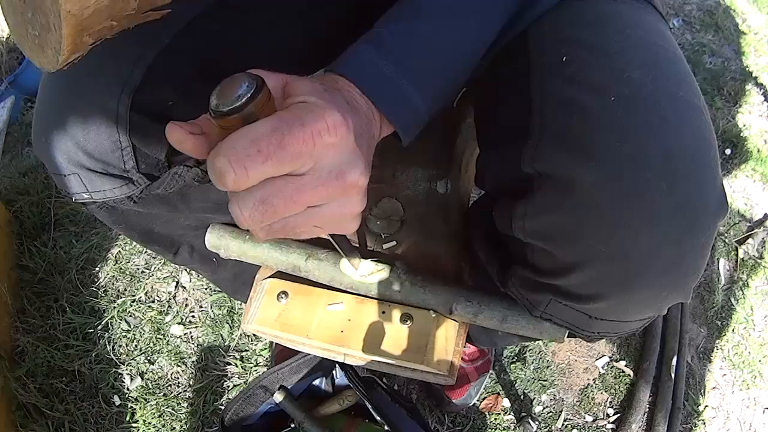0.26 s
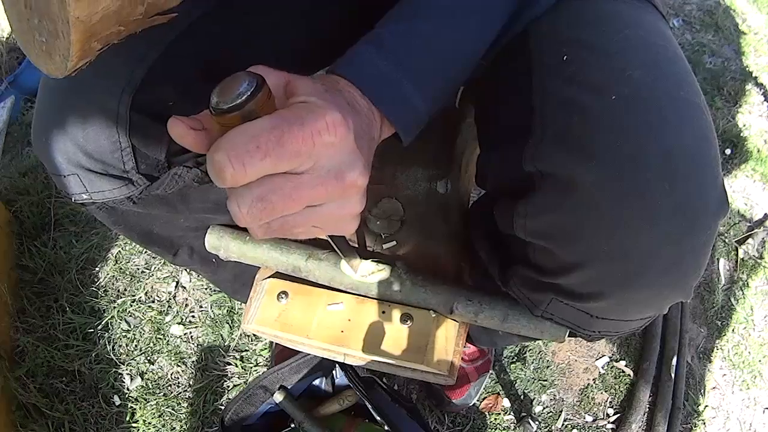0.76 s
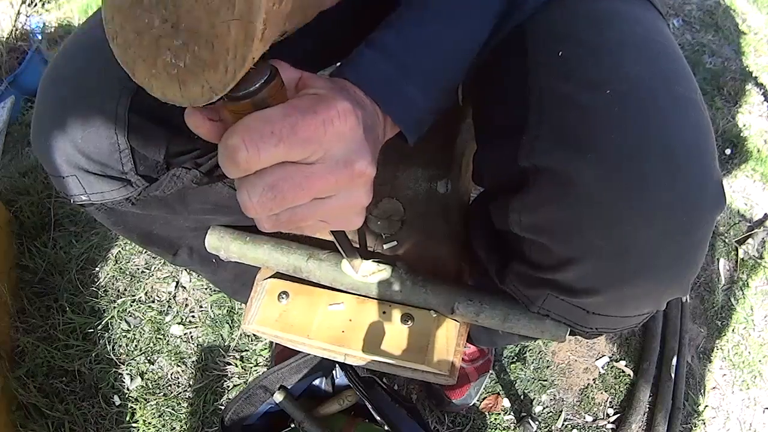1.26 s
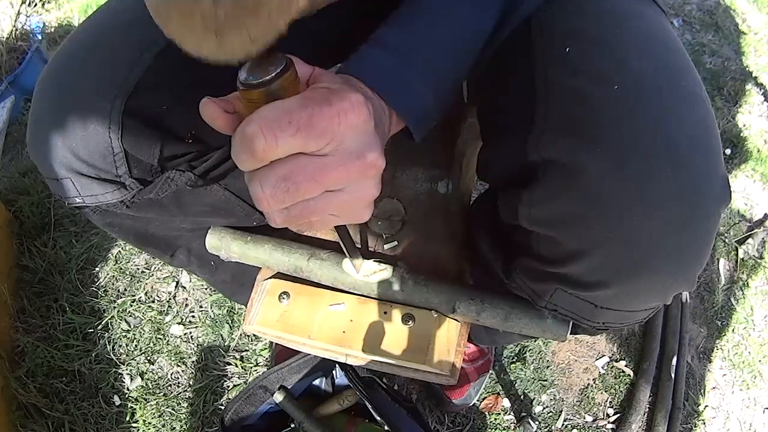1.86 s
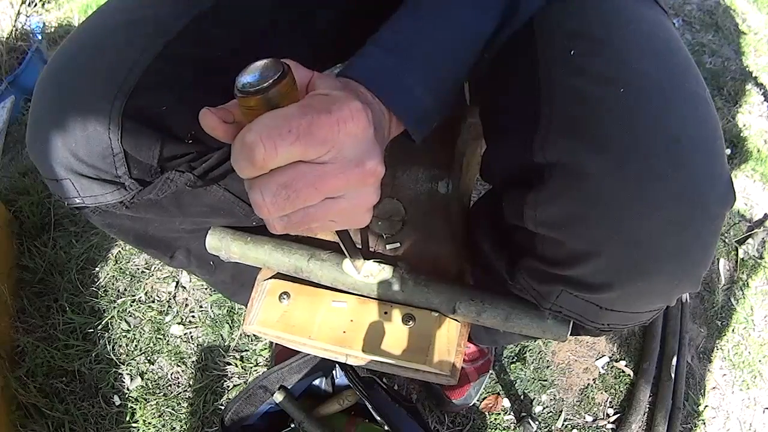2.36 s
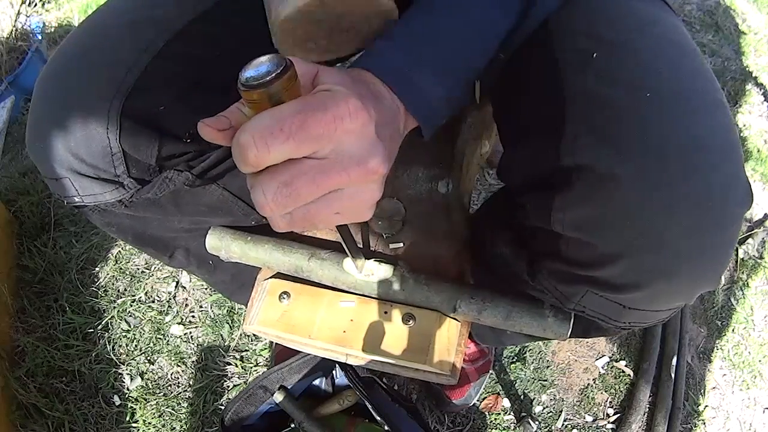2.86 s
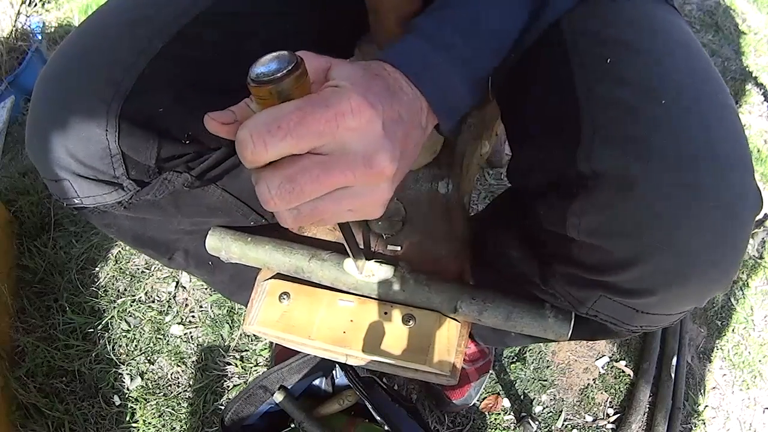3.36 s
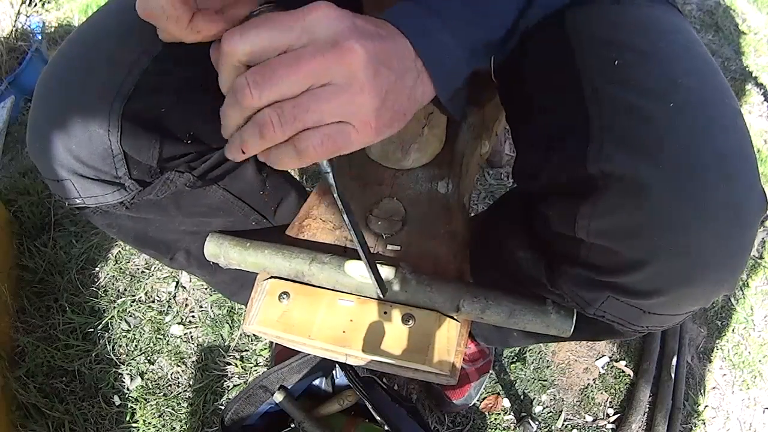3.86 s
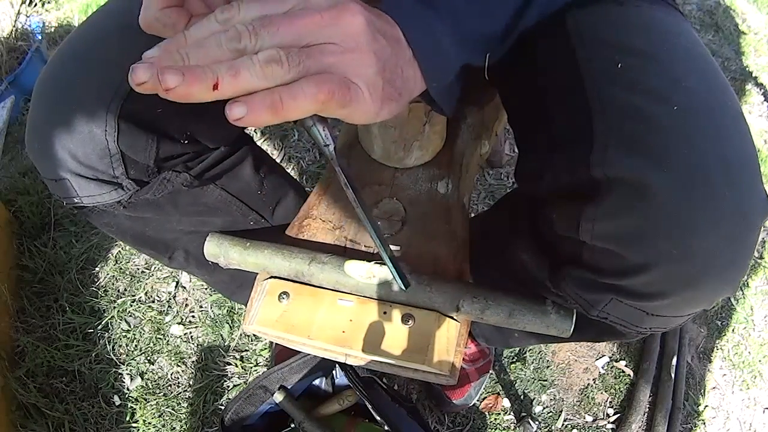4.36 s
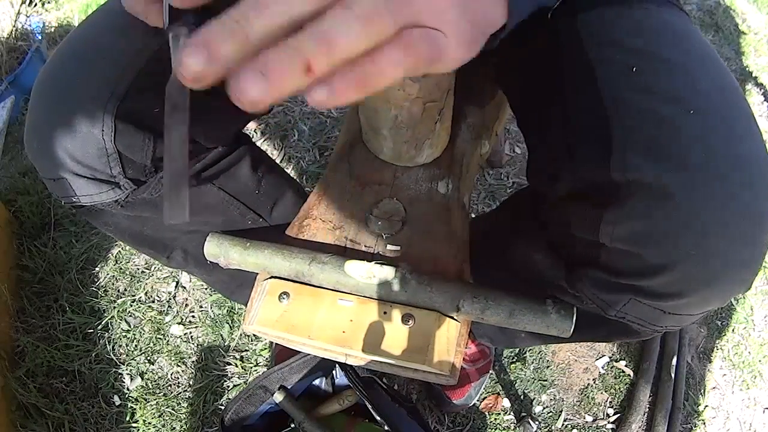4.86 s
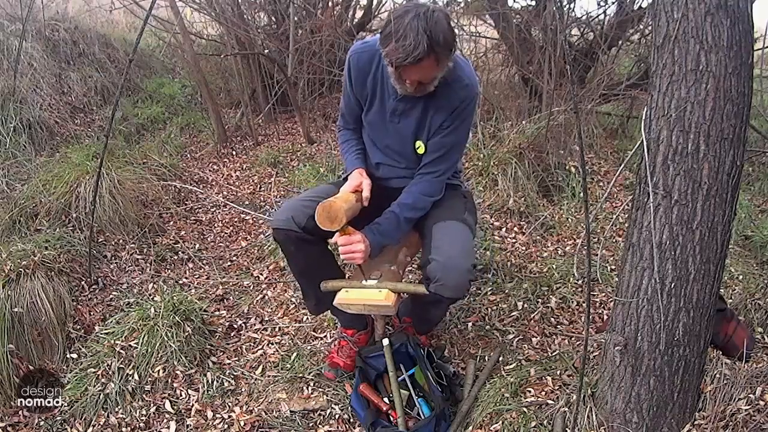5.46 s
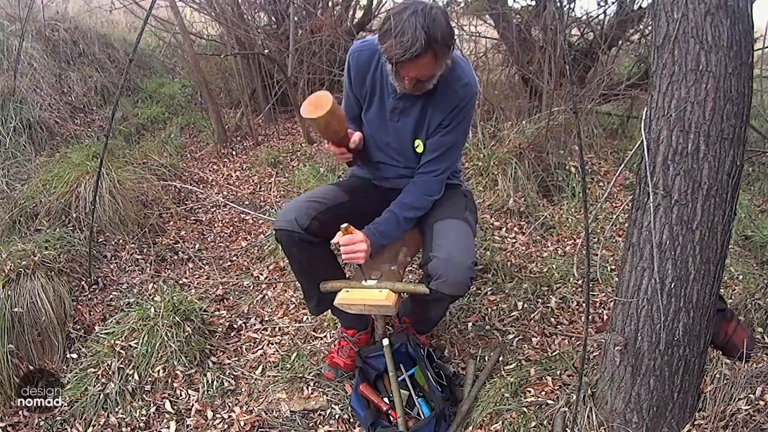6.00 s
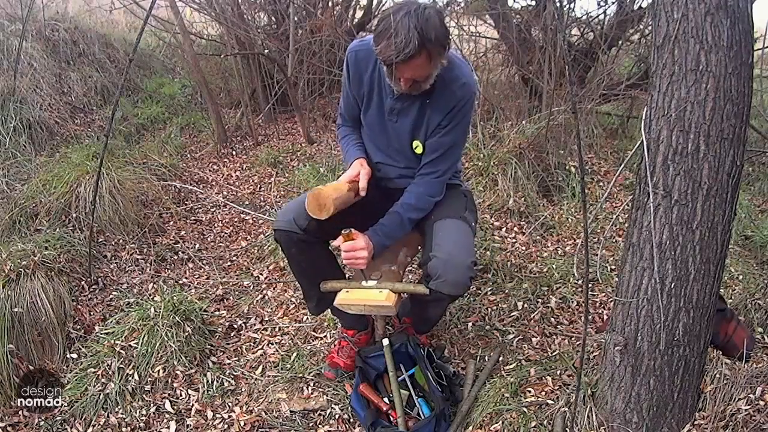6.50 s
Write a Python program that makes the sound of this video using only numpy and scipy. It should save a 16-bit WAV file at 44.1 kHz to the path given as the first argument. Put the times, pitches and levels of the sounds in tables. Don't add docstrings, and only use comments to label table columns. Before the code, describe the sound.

A close stereo microphone hears chisel work on a stick over a hollow block. After almost two seconds of soft open air and tiny ticks, two loud dry knocks split fibres. Wood thuds, gritty rubbing and light hollow taps follow with sleeve rustle. It goes quiet, a few muted bumps return, then a last ringing knock and a brush of cloth, with little reverberation.

```python
import sys
import numpy as np
from scipy import signal
from scipy.fft import rfft, irfft, next_fast_len
from scipy.io import wavfile
from scipy.ndimage import uniform_filter1d

SR = 44100
rng = np.random.default_rng(int(sys.argv[2]) if len(sys.argv) > 2 else 0)


def file_out(sig):
    cols = np.atleast_2d(sig).T
    lim = np.clip(cols, -1, 1)
    pcm = np.round(lim * 32767).astype(np.int16)
    wavfile.write(sys.argv[1], SR, pcm)


def gain_from_db(level_db):
    decades = np.asarray(level_db, float) / 20
    return 10 ** decades


N = 297054

# frequency in Hz, level in dB, decay time t60 in seconds.
FIRST_BLOW_MODES = [(165, -15, 0.083), (283, -5.5, 0.047), (343, -4, 0.12), (817, -7.5, 0.028),
                    (1320, -14.5, 0.043), (1728, -13, 0.08), (2370, -9, 0.017), (2750, -10, 0.037),
                    (2820, -14.5, 0.049), (4000, -18, 0.043), (6400, -2.5, 0.0099), (9000, -18, 0.011)]
SECOND_BLOW_MODES = [(170, -13, 0.035), (347, -9.5, 0.041), (450, -13, 0.24), (820, -2.5, 0.03),
                     (1000, -3, 0.024), (1305, -14, 0.077), (1750, -5, 0.019), (2850, -15.5, 0.026),
                     (4120, -6.5, 0.012), (5800, -24, 0.016), (7400, -23, 0.016)]
THIRD_BLOW_MODES = [(165.6, -9, 0.062), (276, -13, 0.22), (324.5, -4.5, 0.21), (376.6, -14.5, 0.14),
                    (446, -15.5, 0.16), (590, -10, 0.049), (948, -4.5, 0.054), (1500, -13, 0.027),
                    (1620, -2, 0.015), (1870, -5, 0.024), (2470, -24, 0.048), (3870, -10, 0.027),
                    (6500, 1.5, 0.0078), (9800, -21, 0.013)]
# start in seconds, level in dB, contact sharpness in Hz, lowest mode moved in Hz.
FIRST_BLOW_HITS = [
    (1.9115, -13.5, 9000, 30),
    (1.9144, -16, 2970, 1400),
    (1.936, -18.5, 3500, 600),
]
SECOND_BLOW_HITS = [
    (2.4235, -11.5, 9000, 30),
    (2.438, -33, 7000, 1500),
]
THIRD_BLOW_HITS = [
    (6.2476, -16, 9000, 30),
    (6.2503, -7, 2970, 1200),
    (6.2776, -28.5, 5000, 600),
]
# start in seconds, crack level in dB, crack t60 in seconds, scatter level in dB,
# travel time at 1 kHz in seconds.
SPLINTER_CRACKS = [
    (1.9114, -14, 0.027, -31, 0.0041),
    (2.4219, -28.5, 0.015, -35.5, 0.0055),
    (6.2486, -17.5, 0.024, -29.5, .0035),
]
# frequency in Hz, level in dB.
CRACK_SPECTRUM = [(150, -44), (400, -29), (800, -19), (1600, -14), (2300, -17), (6200, -23), (11000, -31),
                  (14000, -60)]
# start in seconds, level in dB, thud pitch in Hz, thud t60 in seconds.
HELD_TAPS = [(2.968, -28, 573, 0.078), (2.972, -20, 325, 0.079), (2.988, -18.5, 825, 0.009),
             (2.995, -17, 295, 0.012), (3.013, -39.5, 690, 0.016), (3.281, -36, 342, 0.037),
             (3.732, -42, 383, 0.042), (5.11, -42, 410, 0.024), (5.182, -38.5, 600, 0.026),
             (5.184, -25, 332, 0.035), (5.211, -37.5, 1000, 0.0085), (5.27, -30, 336, 0.041),
             (5.507, -42.5, 333, 0.025)]
OPEN_TAPS = [
    (3.245, -25, 440, 0.028),
    (3.253, -31.5, 374, 0.074),
    (3.266, -30, 380, 0.018),
    (3.385, -40.5, 360, 0.031),
    (3.474, -41, 360, 0.038),
    (3.613, -34.5, 370, 0.032),
]
# frequency in Hz, level in dB, t60 in seconds.
TAPPED_BLOCK_MODES = [(600, -13.5, 0.016), (880, -13.5, 0.014), (1060, -7.5, 0.011), (1220, -12.5, 0.01),
                      (1400, -20.5, 0.053), (1770, -14.5, 0.013)]
# start in seconds, level in dB, centre pitch in Hz.
CHIP_TICKS = [(0.281, -43.5, 5300), (1.216, -40, 4570), (1.235, -47, 5000), (2.4368, -21, 3770),
              (2.503, -35.5, 3120), (2.9, -36.5, 4570), (2.923, -35, 3750), (2.949, -31, 2100),
              (2.966, -35, 5840), (3.012, -43, 6500), (3.029, -52, 6500), (3.043, -53, 6500),
              (3.056, -35, 5000), (3.246, -42, 2400), (3.6, -46, 5200), (3.731, -47, 4020),
              (3.927, -46, 4000), (4.677, -43, 7400), (4.8225, -41, 8700), (5.179, -39, 1500),
              (5.193, -40.5, 3900), (5.265, -39, 1300), (5.863, -47, 5950), (6.15, -31.5, 5040),
              (6.353, -46.5, 5000), (6.419, -47, 4000), (6.602, -48, 4000)]
LEAD_TICKS = [
    (1.901, -27.5, 3240),
    (1.9108, -36, 6000),
    (2.4232, -53, 6000),
    (6.2457, -43, 7000),
]
# time in seconds, level in dB.
SLIDE_CATCHES = [
    (2.966, -49),
    (3.013, -55),
    (3.031, -60),
]
# full from in seconds, hold in seconds, bright level in dB,
# dull over bright in dB, swell time in seconds.
SLEEVE_STROKES = [(2.265, 0.081, -46.5, -0.5, 0.11), (2.38, 0.023, -58, 5, .05),
                  (2.454, 0.045, -49, 4.5, 0.052), (2.52, 0.384, -58.5, 3, 0.064),
                  (2.71, 0.009, -56, -9, 0.06), (2.92, 0.13, -48.5, -2.5, 0.034),
                  (2.964, 0.025, -41, -22, .006), (3.09, 0.047, -57.5, -3, 0.41),
                  (4.655, 0.036, -57.5, -4, 0.55), (5.19, 0.0055, -59, 2.5, 0.1),
                  (5.46, 0.059, -56.5, -1.5, 0.17), (6.605, 0.091, -47, -16.5, 0.015),
                  (6.71, .04, -51, -5, .02)]
# frequency in Hz, density in dB per Hz.
CLOTH_SPECTRUM = [(240, -29), (400, 2), (582, 1.5), (1010, 3.5), (1120, 4.5), (1340, 6), (1920, 6.5),
                  (5420, -1), (11000, -6), (14300, -11), (22000, -120)]
# frequency in Hz, side over mid in dB.
WORK_WIDTH = [(60, -9), (200, -5), (600, -5), (1100, -3), (1900, -5), (3300, -8), (6000, -9.5),
              (10500, -9.5)]
# frequency in Hz, density in dB per Hz.
AIR_SPECTRUM = [(12, -71), (20, -30), (31, -28), (43, -0.5), (108, -0.5), (127, -4.5), (145, -8.5),
                (266, -13.5), (427, -17.5), (944, -17), (1300, -22.5), (8010, -29.5), (11000, -30.5),
                (14300, -83), (22000, -120)]
# frequency in Hz, side over mid in dB.
OPEN_AIR_WIDTH = [(60, -19), (110, -15.5), (190, -8), (340, -0.5), (600, 2), (1060, 3.5), (1880, 5),
                  (3340, 1.5), (5940, -1.5), (10500, -6.5)]
# time in seconds, level in dB.
RUMBLE_SWELL = [(0.0, -58.5), (0.6, -59.5), (0.86, -62), (1.1, -59), (2.4, -55), (2.8, -52), (3.17, -58.5),
                (4.2, -57), (5.7, -58), (6.1, -55.5), (6.74, -56.5)]
# start in seconds, end in seconds.
SILENT_GAPS = [
    (2.4155, 2.4215),
    (6.737, 6.75),
]

BUILD_UP_CYCLES = 0.3
SCATTER_T60_S = 0.19
STIFF_HZ = 172
SETTLE_S, SETTLE_LOSS_DB, SETTLE_EDGE_S = 0.039, 7.5, 0.0032
HOLLOW_HZ, HOLLOW_T60_S = 463, 0.19
HELD_RING_DB, OPEN_RING_DB = -32.5, -15.5
HELD_SHARPNESS, OPEN_SHARPNESS = 2.7, 2.8
TICK_T60_S, LEAD_T60_S = 0.012, 0.021
SLIDE_FROM_S, SLIDE_HOLD_S, SLIDE_DB, SLIDE_EDGE_S = 2.903, 0.136, -53.5, 0.0066
SLIDE_START_HZ, SLIDE_TOP_HZ, SPEED_UP_S = 4260, 6200, 0.045
CATCH_EDGE_S = 0.024
GRIT_PER_S, GRIT_DB = 1100, 11
STROKE_SWING_DB, FADE_OVER_SWELL = 21.5, 0.82
GROUND_LAG_S = 0.00177
AIR_DB = -55.5
CUTOFF_HZ = 11240


def coloured(x, points, turn=1):
    size = next_fast_len(N + 8192)
    hz = np.maximum(np.arange(size // 2 + 1) * SR / size, 1)
    point_hz, point_db = np.transpose(points)
    gain = gain_from_db(np.interp(np.log(hz), np.log(point_hz), point_db))
    factor = turn(hz) if callable(turn) else turn
    return irfft(rfft(x, size) * gain * factor, size)[:N]


def rms_one(x):
    return x / np.sqrt(np.mean(x ** 2) + 1e-20)


def drift(rate):
    steps = rng.standard_normal(int(N / SR * 60) + 2)
    return np.interp(np.arange(N) / SR * min(rate, 59), np.arange(len(steps)), steps)


def add(out, s, sound):
    at = round(s * SR)
    out[at:at + len(sound)] += sound[:N - at]


def stroke(s, hold, db, swell, fade):
    t = np.arange(N) / SR
    outside = np.maximum((s - t) / swell, 0) + np.maximum((t - s - hold) / fade, 0)
    return gain_from_db(db - STROKE_SWING_DB * np.minimum(outside, 9))


def ringing(modes, sharp_hz, lowest_hz=30):
    t = np.arange(SR // 3) / SR
    rings = 0
    for k, (hz, db, t60) in enumerate(modes):
        sense = (-1) ** k
        build_up = 1 - np.exp(-t * hz / BUILD_UP_CYCLES)
        envelope = sense * gain_from_db(db - 60 * t / t60) * build_up
        moved = 1 / (1 + (lowest_hz / hz) ** 4)
        rings = rings + envelope * np.sin(2 * np.pi * hz * t) * moved
    return signal.lfilter(*signal.butter(2, min(sharp_hz, 15000), fs=SR), rings)


def blows():
    out = np.zeros(N)
    t = np.arange(SR // 2) / SR
    seatings = [(FIRST_BLOW_MODES, FIRST_BLOW_HITS), (SECOND_BLOW_MODES, SECOND_BLOW_HITS),
                (THIRD_BLOW_MODES, THIRD_BLOW_HITS)]
    for (modes, hits), splinter in zip(seatings, SPLINTER_CRACKS):
        s, crack_db, crack_t60, scatter_db, travel_s = splinter
        rings, crack = np.zeros(N), np.zeros(N)
        for hit_s, db, sharp_hz, lowest_hz in hits:
            add(rings, hit_s, gain_from_db(db) * ringing(modes, sharp_hz, lowest_hz))
        settled = np.clip((np.arange(N) / SR - s - SETTLE_S) / SETTLE_EDGE_S, 0, 1)
        rings *= gain_from_db(-SETTLE_LOSS_DB * settled)
        fall = gain_from_db(crack_db - 60 * t / crack_t60) + gain_from_db(scatter_db - 60 * t / SCATTER_T60_S)
        add(crack, s, fall * rng.standard_normal(len(t)))
        wood = rings + gain_from_db(22) * coloured(crack, CRACK_SPECTRUM)

        def bending(hz):
            return np.exp(-4j * np.pi * travel_s * np.sqrt(1000 * (hz + STIFF_HZ)))

        out += coloured(wood, [(20, 0), (20000, 0)], bending)
    return out


def taps():
    out = np.zeros(N)
    for rows, ring_db, sharpness in [(HELD_TAPS, HELD_RING_DB, HELD_SHARPNESS),
                                     (OPEN_TAPS, OPEN_RING_DB, OPEN_SHARPNESS)]:
        for s, db, thud_hz, t60 in rows:
            modes = [(thud_hz, 0, t60), (HOLLOW_HZ, ring_db, HOLLOW_T60_S), *TAPPED_BLOCK_MODES]
            add(out, s, gain_from_db(db) * ringing(modes, sharpness * thud_hz))
    return out


def ticks():
    out = np.zeros(N)
    t = np.arange(SR // 20) / SR
    for rows, t60 in [(CHIP_TICKS, TICK_T60_S), (LEAD_TICKS, LEAD_T60_S)]:
        for s, db, hz in rows:
            burst = gain_from_db(db + 2 - 60 * t / t60) * rng.standard_normal(len(t))
            band = signal.butter(1, [0.65 * hz, min(1.28 * hz, 15000)], "band", fs=SR)
            add(out, s, signal.lfilter(*band, burst))
    return out


def slide():
    moving_s = np.maximum(np.arange(N) / SR - SLIDE_FROM_S, 0)
    hz = SLIDE_TOP_HZ - (SLIDE_TOP_HZ - SLIDE_START_HZ) * np.exp(-moving_s / SPEED_UP_S)
    phase = 2 * np.pi * np.cumsum(hz) / SR
    gain = stroke(SLIDE_FROM_S, SLIDE_HOLD_S, SLIDE_DB, SLIDE_EDGE_S, SLIDE_EDGE_S)
    for s, db in SLIDE_CATCHES:
        gain = gain + stroke(s, 0, db, CATCH_EDGE_S, CATCH_EDGE_S * 0.5)
    grain_here = rng.random(N) < GRIT_PER_S / SR
    grit = 1 + grain_here * gain_from_db(GRIT_DB + 4.8 * rng.exponential(1, N).clip(0, 4))
    one, other = signal.lfilter(*signal.butter(2, 900, fs=SR), grit * rng.standard_normal((2, N)))
    rub = rms_one(one * np.cos(phase) + other * np.sin(phase))
    return gain * gain_from_db(2.1 * drift(55)) * rub


def sleeves():
    catching = gain_from_db(0.35 * rng.exponential(1, N) + 2.0 * drift(45))
    grains = rng.standard_normal((2, N)) * catching
    cloth = np.array([coloured(draw, CLOTH_SPECTRUM) for draw in grains])
    bright = rms_one(signal.lfilter(*signal.butter(2, 1600, "high", fs=SR), cloth))
    dull = rms_one(signal.lfilter(*signal.butter(2, 2000, fs=SR), cloth))
    bright_power = dull_power = 0
    for s, hold, db, dull_db, swell in SLEEVE_STROKES:
        power = stroke(s, hold, db, swell, FADE_OVER_SWELL * swell) ** 2
        bright_power = bright_power + power
        dull_power = dull_power + power * gain_from_db(2 * dull_db)
    return np.sqrt(bright_power) * bright + np.sqrt(dull_power) * dull


def air():
    near, far = [gain_from_db(AIR_DB) * rms_one(coloured(draw, AIR_SPECTRUM))
                 for draw in rng.standard_normal((2, N))]
    low = signal.sosfiltfilt(signal.butter(2, 200, fs=SR, output="sos"), near)
    swell_s, swell_level = np.transpose(RUMBLE_SWELL)
    swell_db = np.interp(np.arange(N) / SR, swell_s, swell_level)
    hiss = (near - low) * gain_from_db(0.6 * drift(3.1))
    rumble = low * gain_from_db(swell_db - swell_db.mean() + 2.1 * drift(9))
    return ports(hiss + rumble, OPEN_AIR_WIDTH, 0.45, far)


def ports(mid, width, alike, other):
    late = alike * coloured(mid, width, -1j)
    diffuse = np.sqrt(1 - alike ** 2) * coloured(other, width)
    side = late + diffuse
    return np.array([mid + side, mid - side])


def scene():
    no_bass = signal.butter(2, 70, "high", fs=SR, output="sos")
    struck = signal.sosfilt(no_bass, blows() + taps() + ticks() + slide())
    lagged = np.roll(struck, round(GROUND_LAG_S * SR))
    bounce = signal.lfilter(*signal.butter(2, 700, "high", fs=SR), lagged)
    cloth, other_cloth = sleeves()
    work = ports(struck, WORK_WIDTH, 0.9, bounce) + ports(cloth, WORK_WIDTH, 0.6, other_cloth)
    return work * gain_from_db([[-0.5], [0.5]]) + air()


def band_limit(x):
    return signal.sosfilt(signal.butter(12, 11140, fs=SR, output="sos"), x)


def record(dry):
    live = np.ones(N)
    for start, end in SILENT_GAPS:
        live[round(start * SR):round(end * SR)] = 0.021
    rounded = 0.71 * np.tanh(dry / 0.67)
    steep = signal.cheby2(14, 43, CUTOFF_HZ * 1.021, fs=SR, output="sos")
    cut = signal.sosfilt(steep, rounded)
    return band_limit(cut * uniform_filter1d(live, size=30))


dry = scene()
out = record(dry)
file_out(out)
```